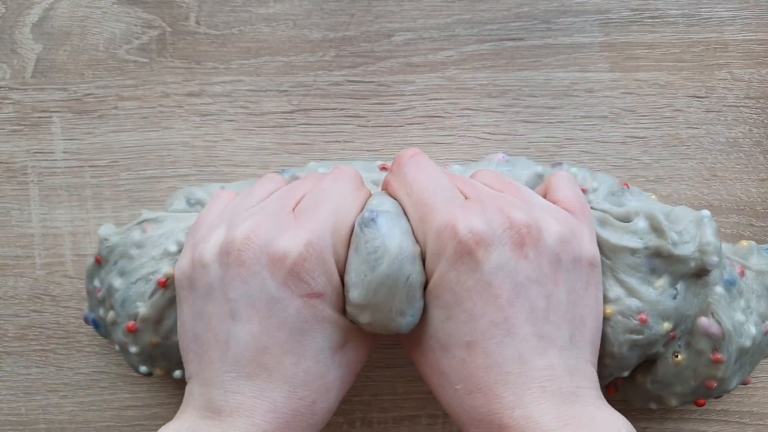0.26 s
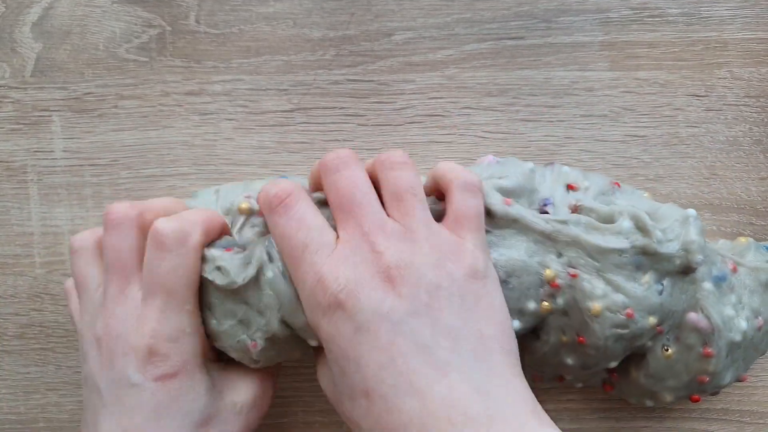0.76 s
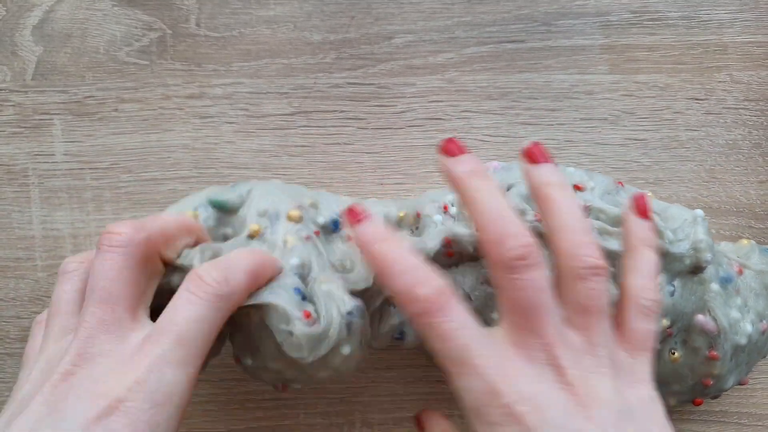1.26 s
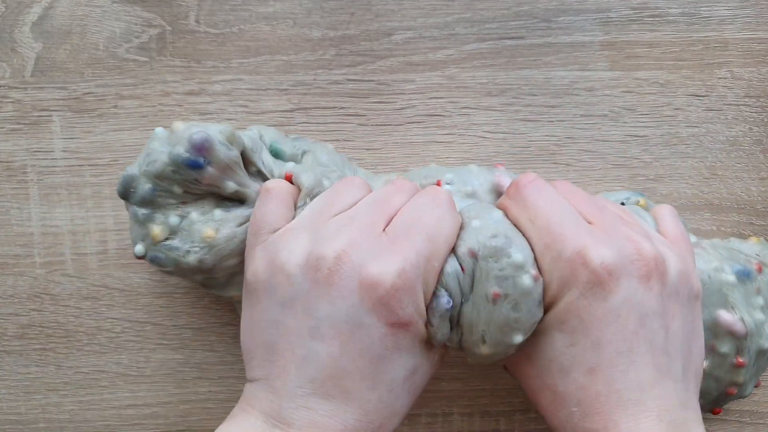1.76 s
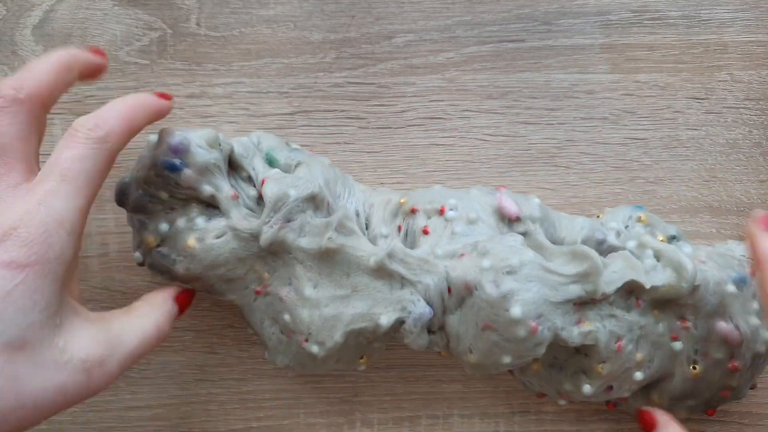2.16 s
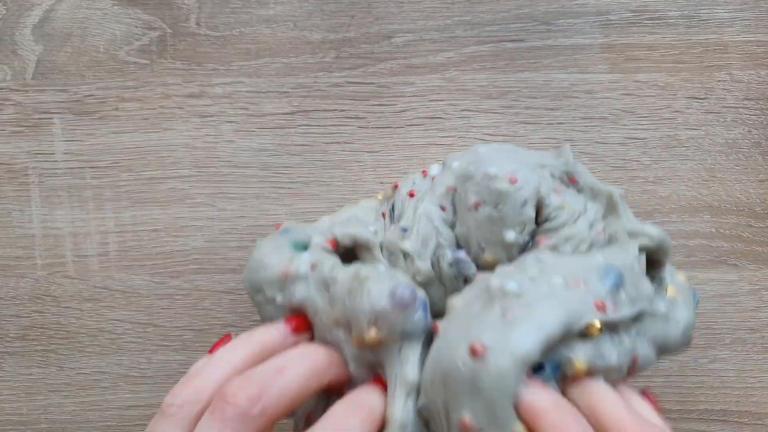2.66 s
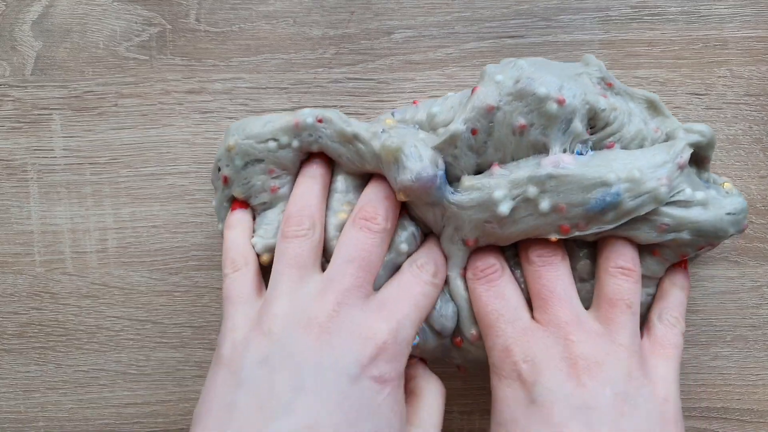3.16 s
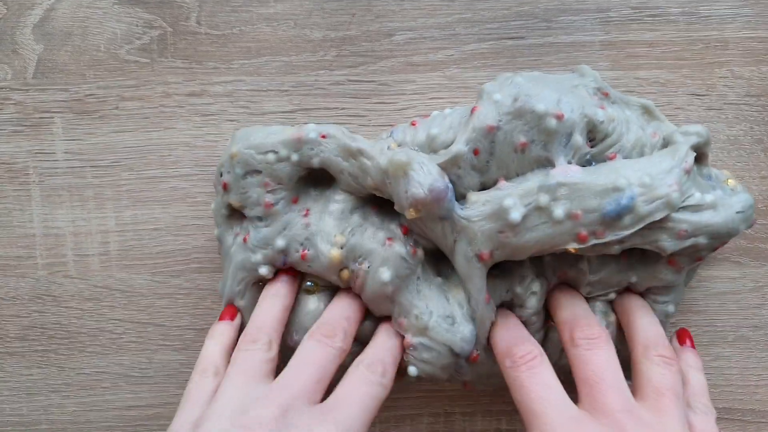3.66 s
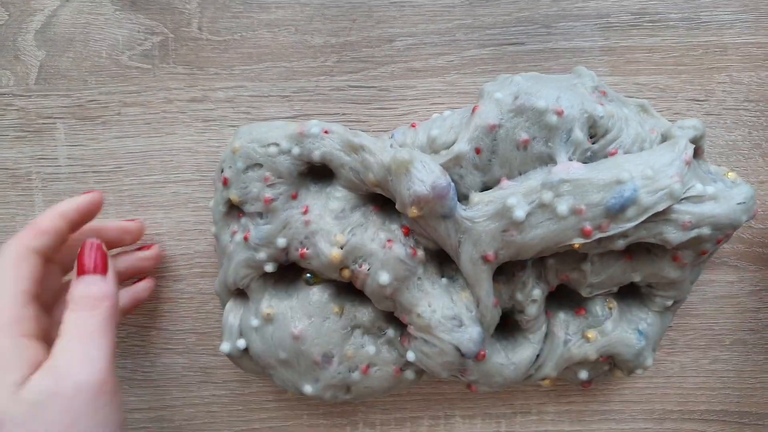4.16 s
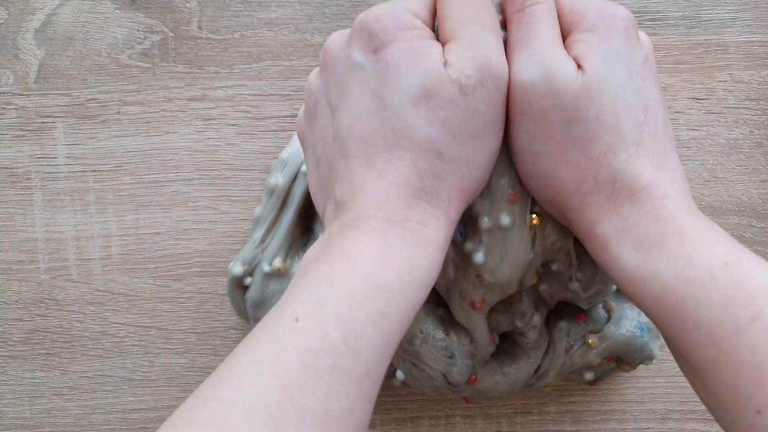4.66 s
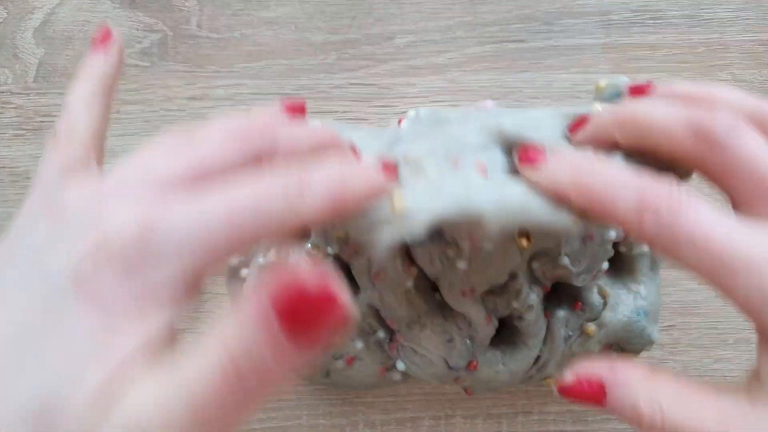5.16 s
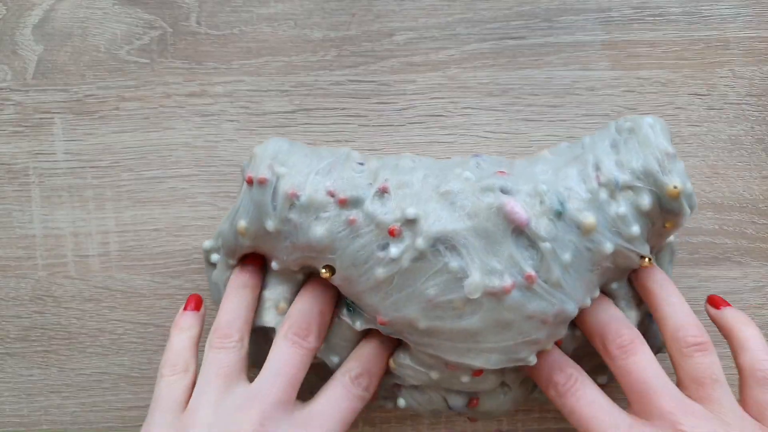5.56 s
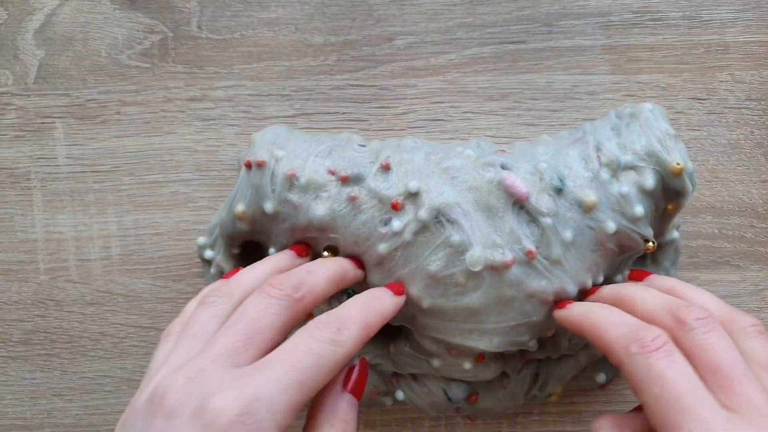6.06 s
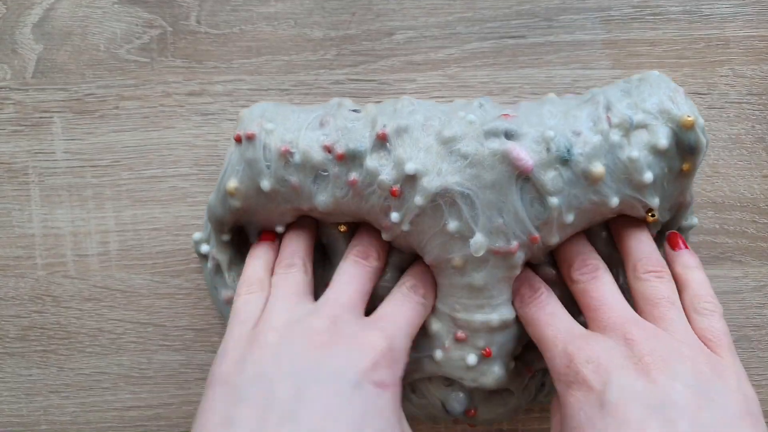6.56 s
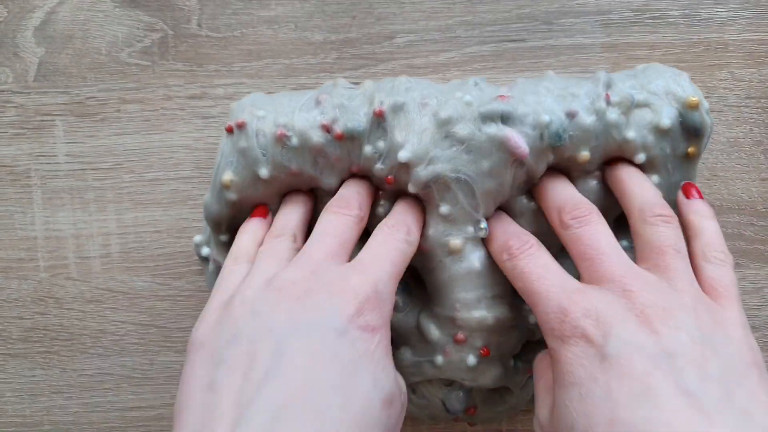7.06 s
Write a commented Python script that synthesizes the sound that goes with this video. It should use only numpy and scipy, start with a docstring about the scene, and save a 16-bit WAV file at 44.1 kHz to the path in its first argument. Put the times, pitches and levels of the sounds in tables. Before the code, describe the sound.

Hands squeeze and knead beaded slime up close, with crisp wet crackles, sharp bubble pops, sticky rips and a few hollow plops in a small room.

```python
"""Two hands squeeze, fold and poke a lump of beaded slime on a wooden table, close to a pair of microphones.
From the start the table trembles and trapped bubbles burst: ringing films make sharp pops over a random crackle.
Bigger bubbles gulp; then finger holes open with hollow decaying notes and skin peels off in rips of tiny bursts.
Later sliding skin gurgles through the folds and pushes thump the table's low modes.
A small room and narrow resonances ring after the slime throughout, over a faint hiss."""
import sys
import numpy as np
from scipy import signal
from scipy.fft import rfft, irfft
from scipy.io import wavfile

SR = 44100
rng = np.random.default_rng(int(sys.argv[2]) if len(sys.argv) > 2 else 0)


def to_wav(sig):
    """Store sig (one row per channel, or 1-D mono) as 16-bit WAV at the path in sys.argv[1].

    Samples outside -1..1 are clipped; the rate is SR.
    """
    pcm = np.clip(np.atleast_2d(sig), -1, 1) * 32767
    pcm = np.round(pcm).astype(np.int16)
    wavfile.write(sys.argv[1], SR, pcm.T)  # frames by channels


N = 322194  # samples


def amp(db):
    """Decibels to gain."""
    return 10 ** (np.asarray(db) / 20)


def evened(x):
    """Scales to rms 1."""
    return x / np.sqrt(np.mean(x ** 2) + 1e-20)


def read(points, hz):
    """Reads a table on a log-frequency axis."""
    f, value = np.transpose(points)
    return np.interp(np.log(hz + 1), np.log(f + 1), value)


def add(mix, start_s, sound):
    """Adds a sound into the mix at start_s, cut off at the end of the mix."""
    part = mix[:, max(round(start_s * SR), 0):][:, :sound.shape[-1]]
    part += sound[..., :part.shape[1]]


# left-right likeness of diffuse sound: freq_hz, correlation (0 to 1)
LIKENESS = [(30, 0.92), (70, 0.93), (250, 1), (550, 0.86), (1000, 0), (2000, 0.92), (4000, 0.32),
            (16000, 0)]


def diffuse(colour, size):
    """Coloured noise of rms 1 arriving from all sides: its left-right correlation varies with frequency."""
    hz = np.fft.rfftfreq(size, 1 / SR)
    left, other = rfft(rng.standard_normal((2, size)))
    same = read(LIKENESS, hz)
    right = same * left + np.sqrt(1 - same ** 2) * other
    return evened(irfft(np.array([left, right]) * amp(read(colour, hz)), size))


# spectrum of the hiss: freq_hz, relative_level_db
HISS_COLOUR = [(20, -3), (150, -3), (400, 4), (1000, -18), (5000, 3), (11000, -20), (16000, -20.5)]


def hiss():
    """Steady faint noise under the whole scene."""
    return amp(-76.5) * diffuse(HISS_COLOUR, N)


def stroke(t, start_s, hold_s, rise_s, fade_s):
    """Gain of one movement: full while held; climbs 20 dB per rise_s, falls 20 dB per fade_s, floor -200 dB."""
    before = (start_s - t) / rise_s
    after = (t - start_s - hold_s) / fade_s
    return amp(-20 * np.maximum(before, after).clip(0, 10))


# arms leaning on the table: start_s, hold_s, relative_level_db
LEANS = [(0, 1.48, -70.5), (1.788, 0.41, -70), (2.45, 0.46, -65.5), (3.503, .7, -67), (4.5, 0.46, -74),
         (6.845, .1, -69.5)]
LEAN_RISE_S, LEAN_FADE_S, STILL_DB = 0.43, 0.32, -88.5
# spectrum of the trembling table: freq_hz, relative_level_db (per Hz)
RUMBLE_COLOUR = [(15, -9.5), (35, -1.5), (55, -1.5), (75, 9), (105, -6.5), (130, -3.5), (250, -28.5),
                 (600, -23), (2000, -70.5)]
# shudder after each push: base level, dB per dB of push level
SHUDDER_BASE_DB, SHUDDER_DB_PER_DB = -57.5, .3
SHUDDER_RISE_S, SHUDDER_FADE_S = 0.087, 0.26


def tremble():
    """The table rumbles under leaning arms and shudders on after each push."""
    t = np.arange(N) / SR
    shakes = [amp(db) * stroke(t, s, hold_s, LEAN_RISE_S, LEAN_FADE_S) for s, hold_s, db in LEANS]
    for s, push_db in PUSHES:
        level = amp(SHUDDER_BASE_DB + SHUDDER_DB_PER_DB * push_db)
        shakes.append(level * stroke(t, s + SHUDDER_RISE_S, 0, SHUDDER_RISE_S, SHUDDER_FADE_S))
    force = np.hypot(np.linalg.norm(shakes, axis=0), amp(STILL_DB))
    return amp(8.5) * force * diffuse(RUMBLE_COLOUR, N)


# hands press in, few separate bursts:
# start_s, hold_s, relative_level_db, large_bubbles_db, tiny_bubbles_db (both re level)
SQUEEZES = [(0.058, .14, -46, -4, -0.5), (0.772, 0.2, -50.5, -5, -4.5), (1.547, 0.18, -50, -3, -9),
            (2.792, 0.14, -50, -7, -10.5), (3.078, 0.06, -52, -11, -17), (3.597, 0.11, -51, -10.5, -15),
            (4.415, 0.11, -48, -4, -4.5), (4.595, .2, -45, -11, -1.5), (4.86, 0.053, -51, -5, -5.5),
            (5.511, 0.17, -65.5, -7, -15.5), (6.301, 0.29, -74.5, 9.5, -7), (7.041, 0.1, -75.5, 2.5, -6)]
SQUEEZE_RISE_S, SQUEEZE_FADE_S, SQUEEZE_BURSTS_PER_S = 0.094, .14, 22
# slime stretches and lets go in a dense rustle:
# start_s, hold_s, fade_s, relative_level_db, large_bubbles_db, tiny_bubbles_db (both re level)
PULLS = [(0.423, 0.083, 0.047, -43.5, 0.5, -8), (1.036, 0.086, 0.076, -42, -7, -24.5),
         (1.168, 0.027, 0.18, -41.5, -1.5, -10), (1.98, .045, 0.093, -43.5, -3, -10.5),
         (2.47, 0.094, 0.13, -42, 1, -7), (3.743, 0.016, 0.21, -44.5, -12.5, -20),
         (4.999, 0.13, 0.081, -39.5, -5.5, -9.5), (7.274, .03, .1, -59.5, -7.5, -34.5)]
PULL_RISE_S, PULL_BURSTS_PER_S = 0.1, 330
# emptied finger hole sags shut, large bubbles only: start_s, relative_level_db
SLUMPS = [(3.38, -49.5), (4.07, -48.5), (6.02, -47), (6.82, -55)]
SLUMP_RISE_S, SLUMP_HOLD_S, SLUMP_FADE_S, SLUMP_BURSTS_PER_S = 0.031, 0.014, .08, 90
# lump ticking faintly by itself: large_db, middle_db, tiny_db (relative)
RESTING_DB = [-80, -85.5, -97]


def kneading(t):
    """Hand movements set the level (dB) of large, middle and tiny bubbles, and bursts per s of each pitch."""
    moves = []  # gain over time, gains of the three sizes, bursts per s
    for s, hold_s, db, large_db, tiny_db in SQUEEZES:
        gain = stroke(t, s, hold_s, SQUEEZE_RISE_S, SQUEEZE_FADE_S)
        moves.append((gain, amp([db + large_db, db, db + tiny_db]), SQUEEZE_BURSTS_PER_S))
    for s, hold_s, fade_s, db, large_db, tiny_db in PULLS:
        gain = stroke(t, s, hold_s, PULL_RISE_S, fade_s)
        moves.append((gain, amp([db + large_db, db, db + tiny_db]), PULL_BURSTS_PER_S))
    for s, db in SLUMPS:
        gain = stroke(t, s, SLUMP_HOLD_S, SLUMP_RISE_S, SLUMP_FADE_S)
        moves.append((gain, [amp(db), 0, 0], SLUMP_BURSTS_PER_S))
    moves.append((np.ones(len(t)), amp(RESTING_DB), SQUEEZE_BURSTS_PER_S))
    power = np.array([np.outer(sizes, gain) ** 2 for gain, sizes, _ in moves])
    share = power.sum(axis=1) / power.sum(axis=(0, 1))  # the strongest movement dominates the density
    bursts_per_s = np.exp(np.log([rate for *_, rate in moves]) @ share)
    return 10 * np.log10(power.sum(axis=0)), bursts_per_s


def bubble(hz, q, pan_db, lag, snap_db=-9, soft=1.58, size=1024):
    """A film snaps and its cavity rings a few cycles; right lags left by lag samples. Mean channel energy 1."""
    f = np.fft.rfftfreq(size, 1 / SR)
    ring = 1 / (1 + 1j * q * (f / hz - hz / (f + 1)))
    snap = 1j * f / (1j * f + 0.27 * hz) / (1 + 1j * f / hz)
    z = ring / np.linalg.norm(ring) + amp(snap_db) * snap / np.linalg.norm(snap)
    u = f / (soft * hz)
    z /= 1 + 1.4j * u - u ** 2  # the film takes a moment to tear, which rounds off the treble
    delay = 8 + np.array([[-lag], [lag]]) / 2  # samples
    pair = irfft(z * np.exp(-2j * np.pi * f * delay / SR)) * amp([[pan_db / 2], [-pan_db / 2]])
    return pair / np.sqrt(np.sum(pair ** 2) / 2)


def swarm(hz, per_s, spread_db, q=4.7):
    """Small bubbles of one pitch burst at random, a few much stronger than the rest. Rms 1."""
    rate = per_s * np.ones(N)
    at = np.flatnonzero(rng.random(N) < rate / SR)
    chance = rng.random(len(at)) * 2 - 1
    strength = amp(spread_db * np.minimum(-np.log(abs(chance) + 1e-9), 3))
    bursts = np.zeros(N)
    bursts[at] = np.sign(chance) * strength / np.sqrt(rate[at])  # dense bursts are smaller
    grain = bubble(hz, q, rng.normal(.8, 1.0), rng.normal(0, 7.3), snap_db=-15.0)
    return evened(signal.oaconvolve(bursts[None], grain, axes=1)[:, :N])


# colour of the crackle by bubble pitch: pitch_hz, relative_level_db
CRACKLE_COLOUR = [(170, -12), (250, 0.5), (400, -6), (600, 1), (950, -3), (1600, -3), (2800, 3), (4800, -1),
                  (7500, 2.5), (11000, 8), (15500, 0.5)]
CLUMP_DB, CLUMP_S = 3.5, .012  # random surges, as of neighbours bursting together: rms, decay


def crackle(count=42):
    """Kneading bursts swarms of bubbles; each pitch follows its size class, every second one rings longer."""
    t, out = np.arange(N) / SR, np.zeros((2, N))
    control_t = t[::128]
    levels, rate = kneading(control_t)
    per_s = np.interp(t, control_t, rate)
    keep = np.exp(-control_t[1] / CLUMP_S)
    surge = signal.lfilter([1], [1, -keep], rng.standard_normal(len(control_t)))
    levels = levels + CLUMP_DB * evened(surge)
    size_weights = [1, 0, 0, 0], [0, 1, 1, 0], [0, 0, 0, 1]  # large, middle, tiny at the corner pitches
    corners = np.log([650, 1400, 5500, 10500])  # Hz
    for k, hz in enumerate(np.geomspace(180, 15000, count)):
        shares = [np.interp(np.log(hz), corners, weights) for weights in size_weights]
        level_db = np.interp(t, control_t, np.dot(shares, levels))
        bubbles = swarm(hz, per_s, spread_db=4., q=(2.2, 5.5)[k % 2])
        out += amp(level_db + read(CRACKLE_COLOUR, hz) - 13.0) * bubbles
    return out


def blips(count=240, energy_db=23, spread_db=4):
    """Wet bubbles deeper in the lump ring on, each at its own pitch; stronger when bursts are sparse."""
    out, draws = np.zeros((2, N)), rng.random((count, 5))
    times = draws[:, 0] * N / SR
    (_, middle_db, _), rates = kneading(times)
    for s, level_db, rate, (_, pitch, length, size, side) in zip(times, middle_db, rates, draws):
        slow = (15 / max(rate, 15)) ** 0.35
        db = energy_db + level_db + spread_db * (2 * size - 1)
        offset = 8 * (side - .5)  # both pan in dB and lag in samples
        out_pair = bubble(950 * 4.2 ** pitch, 5 + 8 * length, offset, offset, snap_db=-24)
        add(out, s, amp(db) * slow * out_pair)
    return out


# large bubbles bursting: start_s, relative_energy_db, pitch_hz, q, left_right_db, extra_room_db
POPS = [(.0088, -17.5, 9000, 0.69, 8, -8), (.0535, -13, 6700, .7, 14.5, -1.5),
        (0.0707, -15.5, 7070, 0.66, 2, -4), (.0942, -4, 4030, .7, 0, 2.5),
        (0.1236, -14.5, 5300, 4, 1.5, 18.5), (0.1369, 6.5, 9050, 1, -1.5, 1),
        (0.1931, -1, 9300, .9, 0, 3.5), (.207, -13, 9400, 1, -4, -13), (0.2553, 1.5, 13100, 1.1, 7, -0.5),
        (0.3096, -11.5, 9600, 1.2, -2, -11), (0.4303, -8, 5160, .8, 0.5, 10.5),
        (.839, -9.5, 6560, 3, 10, -14.5), (0.8547, 4.5, 4470, 4, 4, 9.5),
        (0.8704, -10.5, 5100, 3, -1.5, 23), (.9121, -11.5, 6320, .9, 8, -8),
        (0.9987, 3.5, 4700, 2.9, 1, 17), (1.0028, -11, 4900, 5.4, 4, 7.5), (1.502, -19, 5530, 5.6, -1, 13),
        (1.529, -14, 7100, 1.5, -5, 9), (1.5538, -0.5, 13000, 1.5, -2.5, 2),
        (1.6054, -8, 6100, 2.6, -1, 9.5), (1.64, -5, 7600, .7, 2, -7), (1.719, -1.5, 6670, 1.3, -3, 6),
        (1.7432, 2.5, 6960, .65, 2, 2.5), (1.799, -11, 9000, 2.4, -1, 0), (2.121, -14.5, 2330, 5.4, 1, 4.5),
        (2.4085, -6, 9100, .7, -3, 6), (2.4156, -10.5, 6600, 4, 3, 6), (2.7764, -13, 8800, .55, -0.5, 8),
        (2.7824, 0.5, 7200, 1.3, -3, 4.5), (2.796, -8, 9100, .4, -0.5, 8), (2.8282, -8, 4800, 3.3, 6, 0.5),
        (2.907, -12, 12300, .4, 0, -2.5), (2.9852, -5.5, 5440, .9, 1.5, -3.5),
        (3.06, 3, 5530, 1.4, 2, -1.5), (3.115, -12.5, 5300, .7, 0.5, 11), (3.164, -11, 4300, 2, 1, -3),
        (3.278, -7, 3780, .4, 0.5, 11.5), (3.311, 0.5, 4000, 1.4, 4, -8.5), (3.57, -25.5, 7800, 1.2, 5, 11),
        (3.612, -13.5, 13000, 1.4, 10, 7), (3.6243, -9.5, 3200, .7, -2, 1.5),
        (3.6499, -1.5, 3570, 3.3, 2, 1), (3.6715, -3, 12450, 2.6, 0, -4), (3.945, -10.5, 6100, 2, 11, 8),
        (3.9497, 5, 4840, .9, -1.5, 3), (3.9687, -2.5, 6400, 1, 2, -4.5), (4.3967, -13.5, 6900, 1, 0, 11.5),
        (4.41, -4, 2430, 4.4, -6.5, 9), (4.4263, -9, 3240, .5, 6.5, 5.5), (4.4492, -11, 3940, .7, -1.5, 6),
        (4.485, -6, 3100, 2.6, -0.5, 14.5), (4.507, -10, 4450, 2, 18.5, -12),
        (4.5195, -8.5, 3300, 1.3, -3, 14), (4.5783, -14, 4940, 1.2, 1, 10),
        (4.6326, 5.5, 7660, 4.3, -4.5, 1), (4.681, -7, 13000, 1, 8, 6), (4.7383, 8, 4170, 2.1, -3.5, -2),
        (4.861, -6, 9600, 1, 5, 2), (4.885, -15, 12500, 1.6, 3, 5), (4.939, -16, 4200, 1.4, -5, -4.5),
        (4.998, -18, 4400, .5, 0.5, -2), (5.1854, -4, 7200, 1.9, -0.5, 0),
        (5.361, -33.5, 8860, 0.85, -0.5, 10), (5.494, -30.5, 4950, 0.9, 0, 6),
        (5.9008, -9.5, 4500, 1.3, 1.5, -6.5), (5.9243, -6, 4550, 1, -5, -3),
        (5.931, 5, 4400, 2.1, -1, -0.5), (5.9653, 5, 3560, .5, -2.5, -2),
        (6.286, -47, 4540, 0.77, -1, -3.5), (6.3824, -18.5, 12200, 1.6, 4, -2.5),
        (6.41, -23.5, 7830, 1.2, 0, 9), (6.7043, 10.5, 4470, 2.4, 0, -2), (6.7198, 0.5, 6450, 2.2, 2, -1.5),
        (7.0524, -23.5, 8300, 1.5, 1, 12), (7.211, -25, 9800, 4.5, 4, -4)]


def pops():
    """Large bubbles snap and ring briefly: direct sound, and what is thrown into the room."""
    near, far = np.zeros((2, 2, N))
    lags = rng.normal(0, 2.59, len(POPS))  # samples
    for (s, db, hz, q, pan_db, room_db), lag in zip(POPS, lags):
        pop = amp(db - 4.5) * bubble(hz, q, pan_db, lag)
        start_s = s - 8 / SR  # undoes the delay inside bubble()
        add(near, start_s, pop)
        add(far, start_s, pop * amp(room_db))
    return near, far


def nearby(x, scatter_db=-8, scatter_t60_s=0.014, fold_db=-7, fold_t60_s=0.0081, bounce_db=-17, bounce_s=0.0034):
    """Folds of slime, then hands and table top, scatter each burst for milliseconds, with one clearer bounce."""
    t, taps = np.arange(2048) / SR, np.zeros((2, 2048))
    highpass = signal.butter(2, 3200, "high", fs=SR, output="sos")  # small things scatter only short waves
    for db, t60_s in [(fold_db, fold_t60_s), (scatter_db, scatter_t60_s)]:
        echoes = diffuse([(100, 0.017), (16000, 0.016)], size=2048)
        echoes = echoes * amp(-60 * t / t60_s) * (t > .0002)
        echoes = signal.sosfilt(highpass, echoes)
        taps += amp(db) * echoes / np.linalg.norm(echoes[0])
    taps[:, round(bounce_s * SR)] += amp(bounce_db)
    return x + signal.oaconvolve(x, taps, axes=1)[:, :N]


# decay of the room: freq_hz, t60_s
ROOM_T60 = [(150, 0.32), (400, 0.28), (1000, 0.32), (2800, 0.35), (7000, .36), (15000, 0.23)]
# colour of the room's tail: freq_hz, relative_level_db
ROOM_COLOUR = [(60, 7), (160, -5), (240, 4), (400, -4.5), (570, -2), (1000, -5), (2500, -4), (5000, -3.5),
               (9000, -4.5), (16000, 0.5)]


def room(x):
    """A small room: a diffuse tail whose top treble dies first."""
    noise = diffuse([(100, 0.0059), (16000, 0.015)], size=SR)
    hz, t, z = signal.stft(noise, SR, nperseg=256)
    z = z * amp(-60 * t / read(ROOM_T60, hz)[:, None])
    tail = signal.istft(z, SR, nperseg=256)[1][:, :SR]
    tail *= 1 - np.exp(-np.arange(SR) / SR / 0.0027)
    tail /= np.linalg.norm(tail[0])
    colour = amp(read(ROOM_COLOUR, np.arange(SR // 2 + 1)))  # bins are 1 Hz apart
    tail = irfft(rfft(tail) * colour)[:, :SR * 3 // 4]
    return signal.oaconvolve(x, tail, axes=1)[:, :N]


# narrow resonances of table and room: freq_hz, relative_level_db, t60_s
MODES = [(218.5, -7, 0.58), (256, -1.5, 0.28), (342.5, -3.5, 0.072), (429, -8.5, 0.22), (574.4, 5, 0.084),
         (630, -1, .25), (760, -11.5, 0.35)]


def standing(x, modes_db=-30):
    """Bursts, rips and plops feed the narrow resonances of table and room."""
    t = np.arange(SR // 2) / SR
    ring = np.zeros(len(t))
    for hz, db, t60_s in MODES:
        mode = amp(-60 * t / t60_s) * np.sin(2 * np.pi * hz * t)
        ring += amp(modes_db + db) * mode / np.linalg.norm(mode)
    return signal.oaconvolve(x, ring[None], axes=1)[:, :N]


# big wet bubbles opening deep in the lump: start_s, relative_energy_db, pitch_hz
GULPS = [(.081, -21, 800), (.095, -13, 1030), (.341, -22, 1100), (2.12, -15.5, 800), (2.641, -18, 2510),
         (2.688, -24, 2800), (2.761, -21.5, 2100), (3.318, 0.5, 1890), (3.624, -14.5, 1900),
         (4.411, -18, 2200), (4.484, -15, 2470), (4.43, -11.5, 2700), (4.508, -12.5, 3000),
         (4.516, -6.5, 2430), (4.53, -6, 2600), (4.545, -12, 670), (4.579, -10.5, 1850), (4.632, -6, 1780),
         (4.738, -32, 1200), (4.773, -13, 1250), (4.841, -18.5, 1160), (4.922, -15, 1250),
         (4.997, -14, 1150), (5.107, -15.5, 1050), (5.134, -18, 1330), (5.955, -20, 2050),
         (5.964, -1.5, 1640), (5.973, -13, 850), (6.719, -10, 945)]
GULP_Q, GULP_ROOM_DB = 6.8, 1.5


def gulps():
    """Each big cavity rings a few cycles, low and round, with a weak snap."""
    out = np.zeros((2, N))
    for (s, db, hz), (pan_db, lag) in zip(GULPS, rng.normal(0, 1.5, (len(GULPS), 2))):
        add(out, s, amp(db - 3) * bubble(hz, GULP_Q, pan_db, lag, snap_db=-12.5))
    return out


# air pockets opening under the fingers: start_s, relative_level_db, pitch_hz
PLOPS = [(0.361, -24, 412), (.415, -26.5, 330), (0.869, -26.5, 270), (1.184, -28, 288), (1.743, -31, 283),
         (1.934, -21, 263), (2.344, -31, 750), (2.794, -22.5, 252), (3.289, -14, 238), (3.311, -9, 231),
         (3.648, -26.5, 252), (3.951, -14, 516), (3.969, -14.5, 553), (3.986, -13, 323), (3.988, -21, 575),
         (4.02, -29.5, 324), (4.484, -29, 282), (4.52, -40.5, 296), (4.781, -30.5, 275), (5.035, -28, 300),
         (5.9, -34, 472), (5.916, -20.5, 247), (5.956, -18.5, 214), (5.965, -19, 574), (6.704, -14.5, 278),
         (6.729, -13, 277), (6.919, -40.5, 250)]


def plops(pocket_t60_s=0.027, ring_db=-14, reach_octaves=1.0, slosh_db=-9, slosh_t60_s=0.071):
    """A finger hole opens with a short hollow note and a lumpy slosh, and rings the modes near its pitch."""
    t, out = np.arange(SR // 2) / SR, np.zeros((2, N))
    phases = rng.normal(0, 0.13, (len(MODES), 2, 1))  # rad, slightly different at each microphone
    slosh_colour = [(60, -42.0), (170, -19.0), (280, 3.5), (550, 0.5), (850, -2.5), (1500, -28.5), (5000, -67)]
    for s, db, hz in PLOPS:
        pocket = np.sin(2 * np.pi * hz * t) * amp(-60 * t / pocket_t60_s)
        slosh = diffuse(slosh_colour, size=len(t)) * amp(slosh_db - 60 * t / slosh_t60_s)
        ring = np.zeros((2, len(t)))
        for (mode_hz, mode_db, t60_s), phase in zip(MODES, phases):
            mode = amp(mode_db - 60 * t / t60_s) * np.sin(2 * np.pi * mode_hz * t + phase)
            ring += mode / (1 + (np.log2(mode_hz / hz) / reach_octaves) ** 2)
        opening = (pocket + slosh) * (1 - np.exp(-t / 0.0019))
        ringing = amp(ring_db) * ring * (1 - np.exp(-t / 0.0082))
        add(out, s, amp(db - 2) * (opening + ringing))
    return out


# skin peeling out of the slime: peak_s, relative_level_db, rise_s, fade_s (both to 1/e), centre_hz
SMACKS = [(.45, -40.5, 0.12, 0.018, 4000), (1.04, -38, 0.01, 0.083, 4860),
          (1.928, -38.5, 0.015, 0.024, 2660), (2.342, -40.5, 0.0012, 0.038, 850),
          (2.614, -31.5, 0.0011, 0.002, 5000), (2.663, -39.5, 0.0013, 0.0047, 2760),
          (2.721, -43.5, 0.0012, 0.0035, 6000), (2.795, -31, 0.0074, 0.0058, 2520),
          (3.283, -27.5, 0.013, 0.039, 3050), (3.314, -34, 0.0046, 0.023, 1720),
          (3.966, -28.5, 0.014, 0.035, 2020), (4.213, -61, .002, 0.033, 1800),
          (4.372, -51.5, 0.11, 0.066, 1900), (4.513, -29.5, 0.0077, 0.011, 2540),
          (4.543, -33, .003, 0.0041, 2000), (5.526, -58, 0.013, 0.0069, 3030),
          (5.59, -49.5, 0.0036, 0.022, 5050), (5.934, -32.5, 0.019, 0.019, 2970),
          (5.968, -34, 0.0026, 0.042, 1700), (6.33, -52.5, 0.0036, 0.011, 1990),
          (6.362, -44.5, 0.0011, 0.0038, 4900), (6.467, -56, .001, .002, 6850),
          (6.718, -30, 0.017, 0.048, 3000), (7.245, -55.5, 0.0053, 0.012, 2440),
          (7.27, -57, 0.013, 0.021, 1980)]


def smacks(count=20, slope_db_per_octave=3.5):
    """A finger tears loose: a dense rip of tiny bursts swells and quickly dies."""
    t, out = np.arange(N) / SR, np.zeros((2, N))
    pitches = np.geomspace(500, 13000, count)
    force = []
    for s, db, rise_s, fade_s, _ in SMACKS:
        before = ((s - t).clip(0) / rise_s) ** 1.3
        after = (t - s) / fade_s
        force.append(amp(db) * np.exp(-np.maximum(before, after).clip(0, 30)))
    octaves = abs(np.log2(pitches[:, None] / np.array(SMACKS)[:, -1]))
    colour = amp(-slope_db_per_octave * octaves)
    colour /= np.linalg.norm(colour, axis=0)
    for hz, level in zip(pitches, colour @ np.array(force)):
        out += level * swarm(hz, per_s=300, spread_db=3.5)
    return out


# sticky skin sliding over the slime: start_s, hold_s, rise_s, level_db
SLIDES = [(2.351, .01, 0.01, -56), (2.39, .02, 0.033, -48.5), (4.214, 0.00385, 0.0063, -46.5),
          (4.287, .06, 0.064, -48), (5.702, 0.093, 0.19, -65), (6.32, 0.015, 0.14, -63.5),
          (6.668, .03, .15, -73), (7.27, 0.0094, 0.04, -53.5)]
SLIDE_FADE_S = 0.088
# folds that the air squeezes through: pitch_hz, q, relative_level_db
FOLDS = [(590, 8.4, 1.5), (700, 2.6, -4), (450, 2, -4)]


def gurgle():
    """Skin drags over the slime and squeezes air through a few folds: low-passed swarms of bubbles."""
    t = np.arange(N) / SR
    drag = sum(amp(db) * stroke(t, s, hold_s, rise_s, SLIDE_FADE_S) for s, hold_s, rise_s, db in SLIDES)
    bubbling = sum(amp(db) * swarm(hz, per_s=160, spread_db=7.5, q=q) for hz, q, db in FOLDS)
    muffled = signal.sosfilt(signal.butter(2, 1500, fs=SR, output="sos"), bubbling)  # the slime covers the folds
    return drag * evened(muffled)


# soft pushes on the table: peak_s, relative_level_db
PUSHES = [(3.319, -27), (3.418, -36), (3.552, -42), (3.745, -43.5), (4.036, -32.5), (4.172, -59.5),
          (5.956, -34), (6.019, -36), (6.785, -40), (6.925, -43)]
# low modes of the table top: freq_hz, relative_level_db
TABLE_MODES = [(54, -9), (76, -31.5), (105, -6.5)]


def thumps(swell_s=0.022):
    """Each push excites the table top's low modes, swelling for swell_s and then dying away."""
    t, out = np.arange(SR // 4) / SR, np.zeros((2, N))
    swelling = (t / swell_s) ** 2 * np.exp(2 - 2 * t / swell_s)
    count = len(TABLE_MODES)
    for s, db in PUSHES:
        phases = rng.uniform(0, 2 * np.pi, (count, 1, 1)) + rng.normal(0, 1.0, (count, 2, 1))
        ring = np.zeros((2, len(t)))
        for (hz, mode_db), phase in zip(TABLE_MODES, phases):
            ring += amp(mode_db) * np.sin(2 * np.pi * hz * t + phase)
        add(out, s - swell_s, amp(db) * swelling * ring)
    return out


def scene():
    """Slime, table and room together over a faint hiss, the left slightly louder."""
    near, far = pops()
    deep = gulps()
    near = near + deep
    far = far + amp(GULP_ROOM_DB) * deep
    fizz = crackle() + gurgle() + blips()
    rips, hollow = smacks(), plops()
    direct = nearby(amp(2.0) * near + fizz + rips) + hollow
    tail = room(amp(-5) * far + amp(-3) * fizz + amp(-7) * rips + amp(-2.0) * hollow)
    resonance = standing(near + fizz + rips + amp(-14.5) * hollow)
    table = tremble() + thumps()
    return (direct + tail + resonance + table + hiss()) * amp([[.4], [-.4]])


EDGE_HZ = 16100


def record(dry):
    """Rounds off the loudest peaks just below full scale, then low-passes at EDGE_HZ."""
    rounded = .95 * np.tanh(dry / .95)
    lowpass = signal.firwin(255, EDGE_HZ, window=("kaiser", 8), fs=SR)
    return signal.oaconvolve(rounded, lowpass[None], "same")


dry = scene()
out = record(dry)
to_wav(out)
```